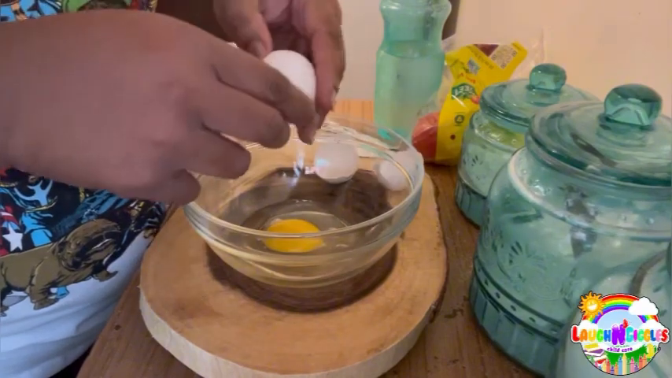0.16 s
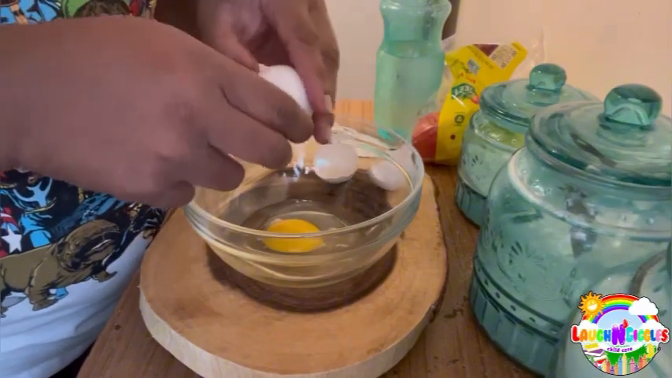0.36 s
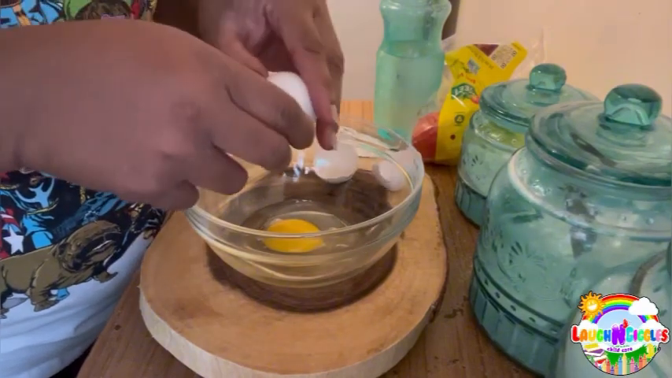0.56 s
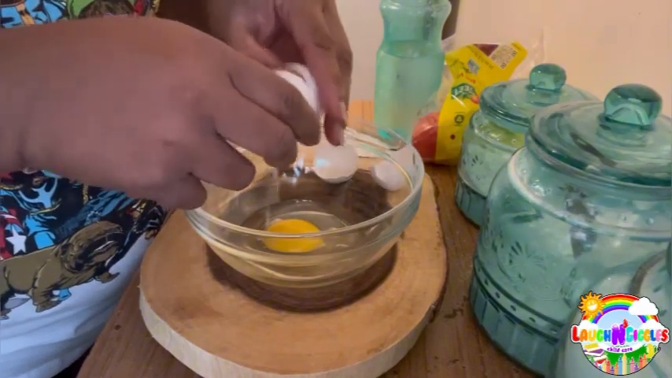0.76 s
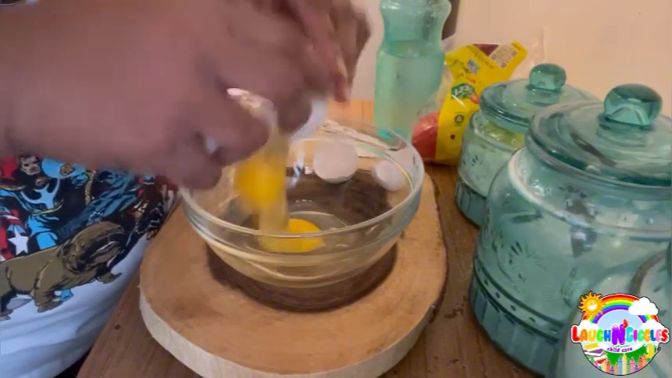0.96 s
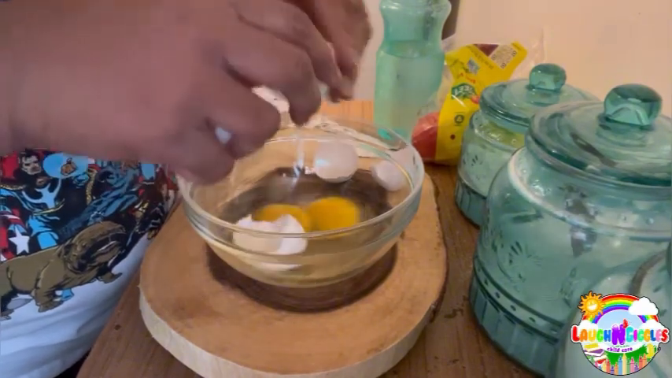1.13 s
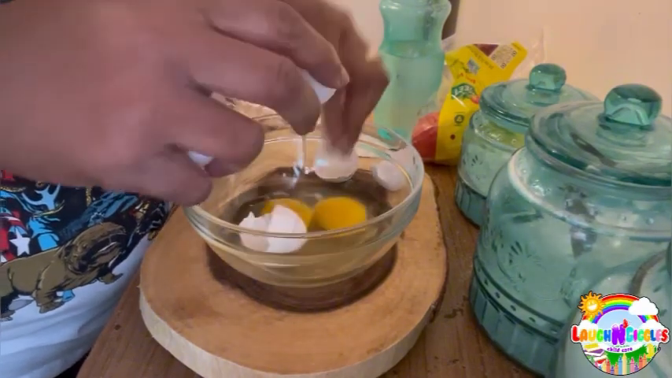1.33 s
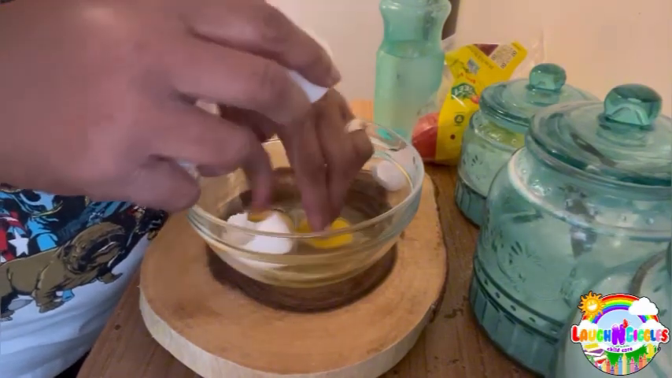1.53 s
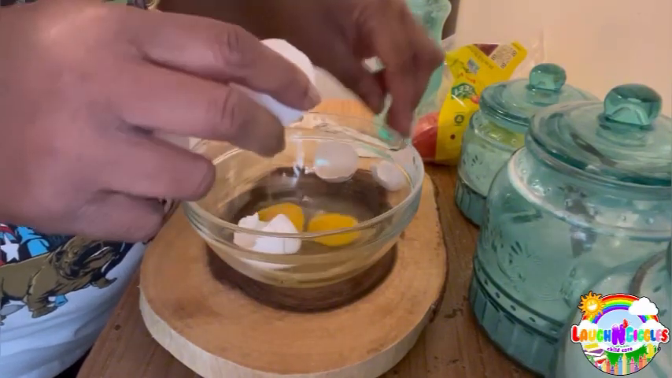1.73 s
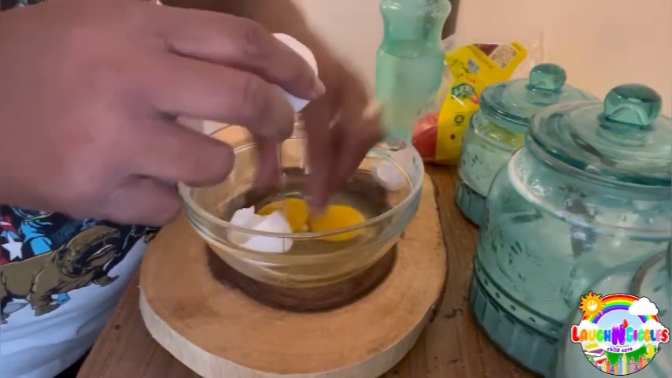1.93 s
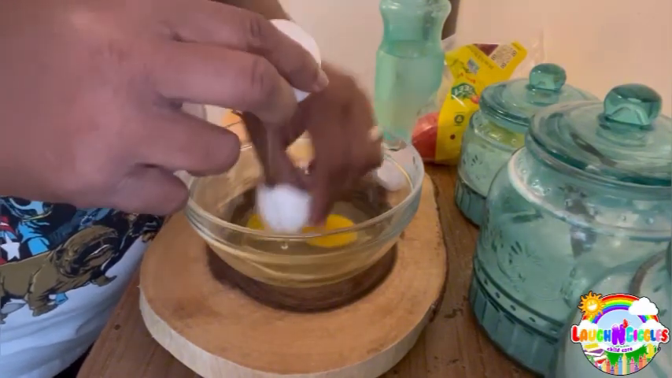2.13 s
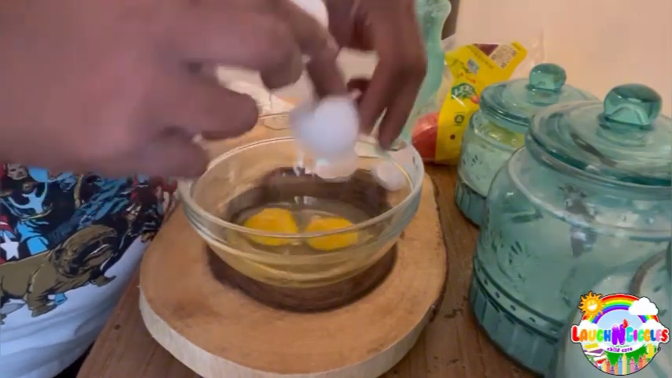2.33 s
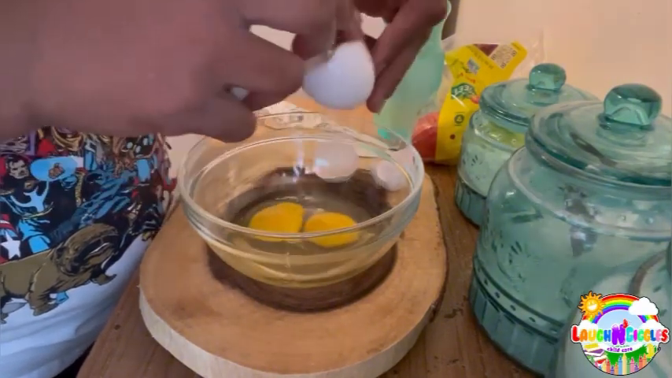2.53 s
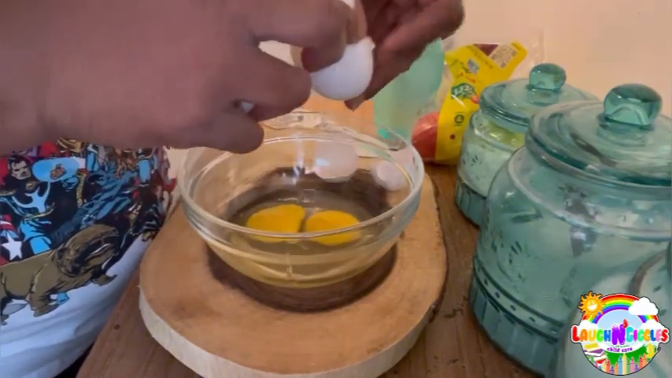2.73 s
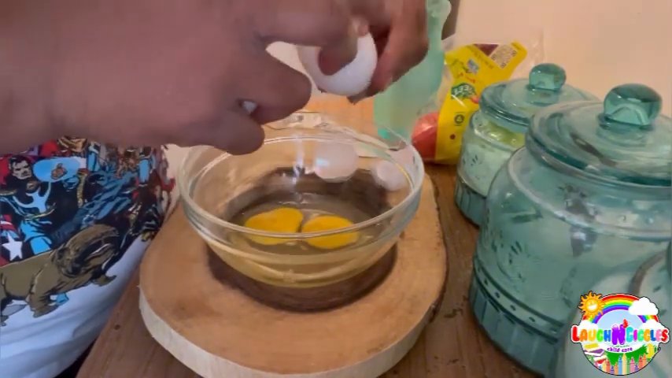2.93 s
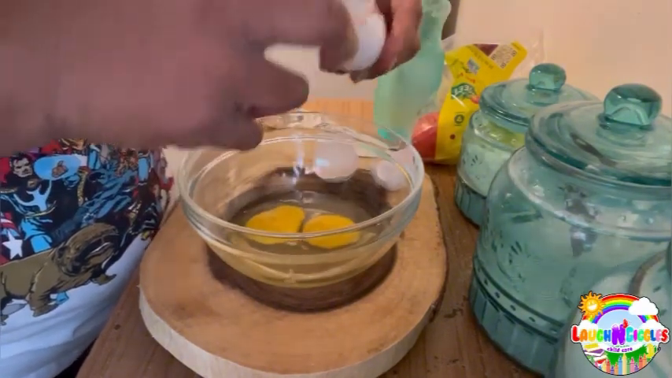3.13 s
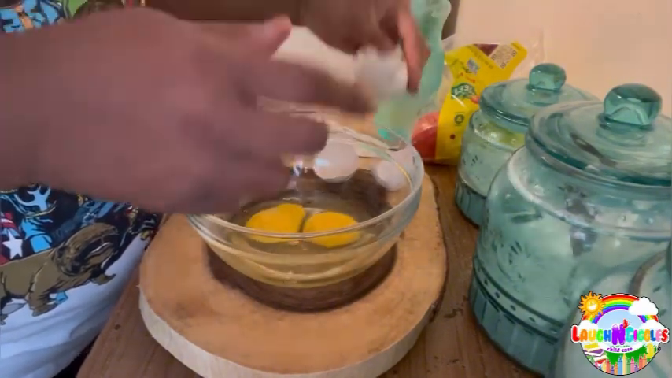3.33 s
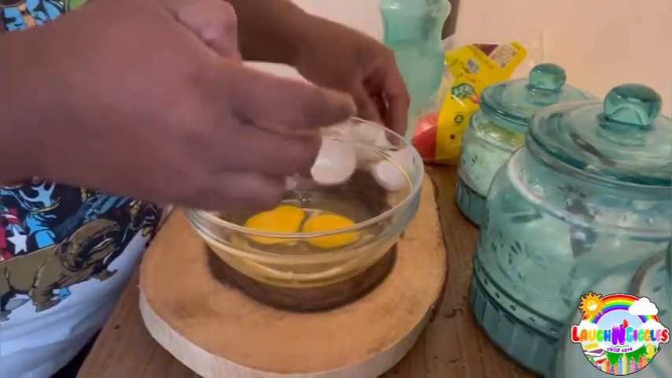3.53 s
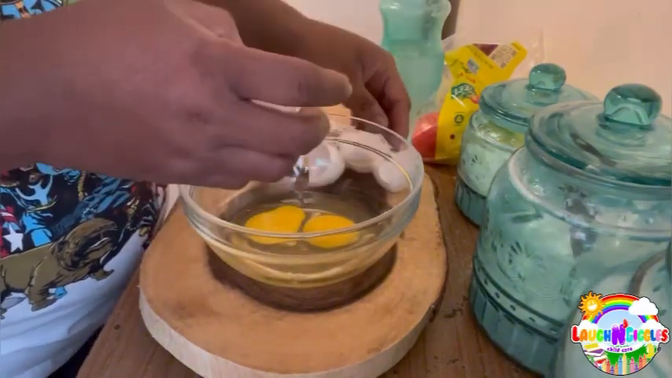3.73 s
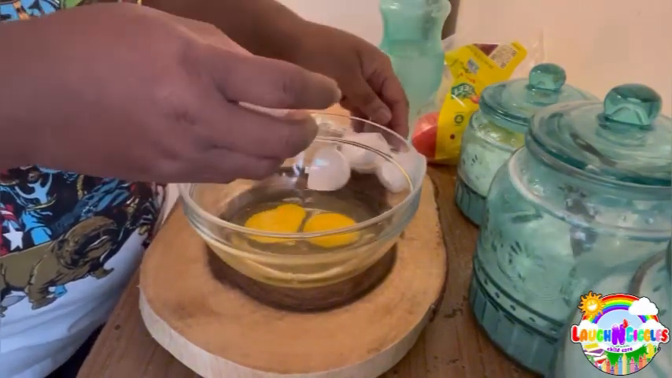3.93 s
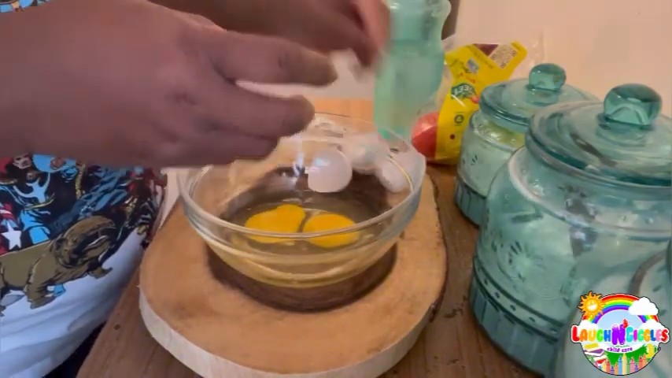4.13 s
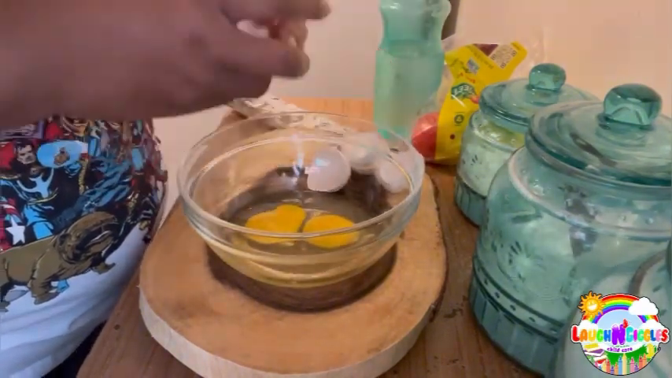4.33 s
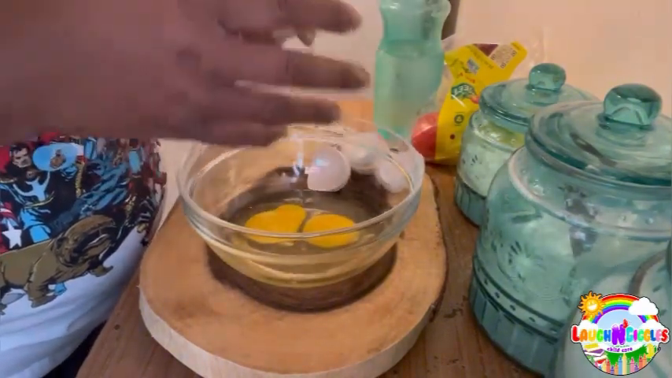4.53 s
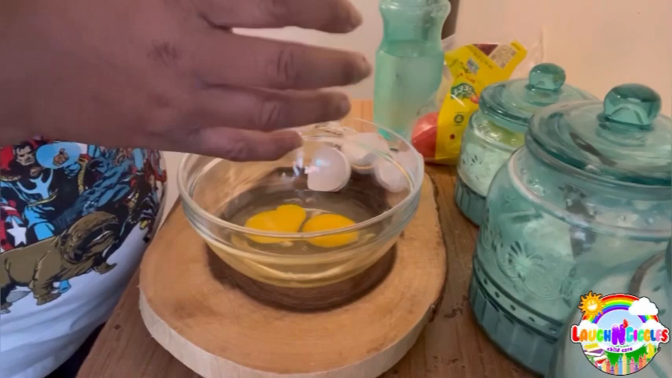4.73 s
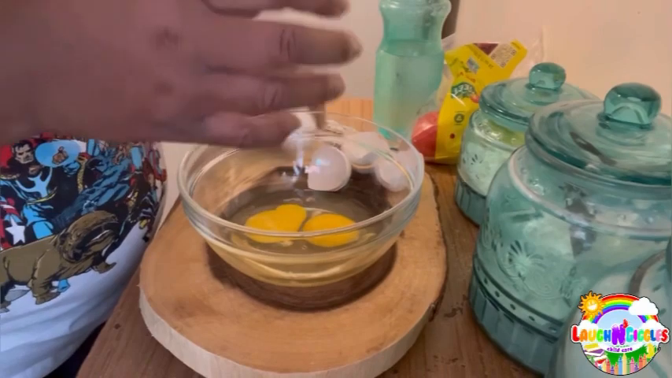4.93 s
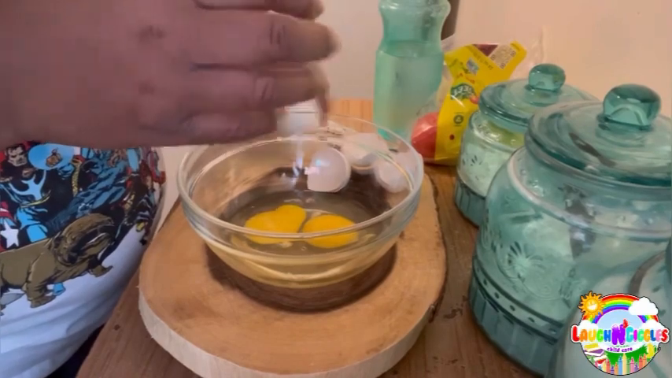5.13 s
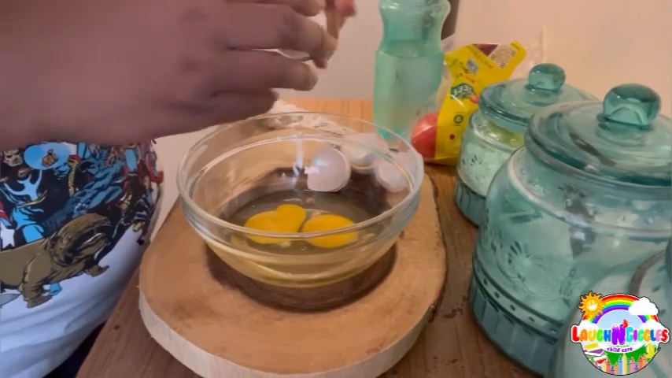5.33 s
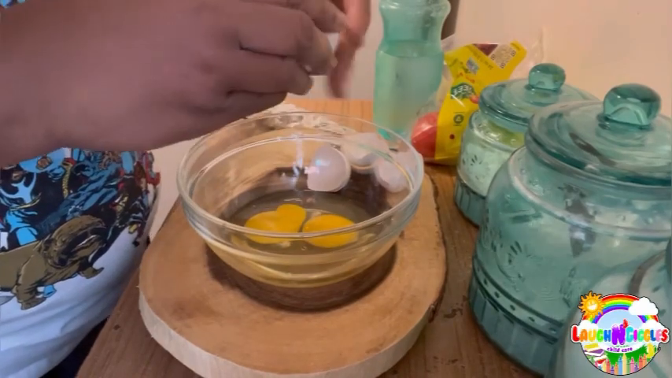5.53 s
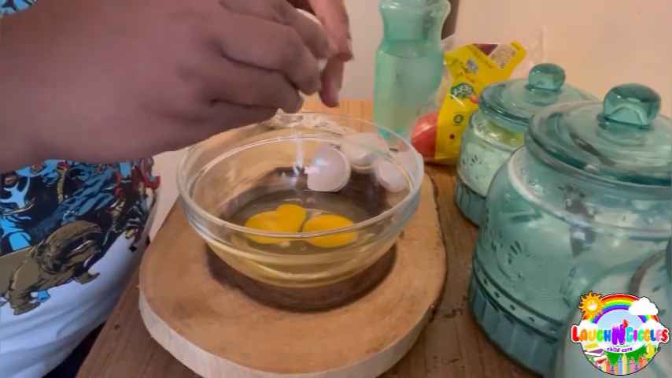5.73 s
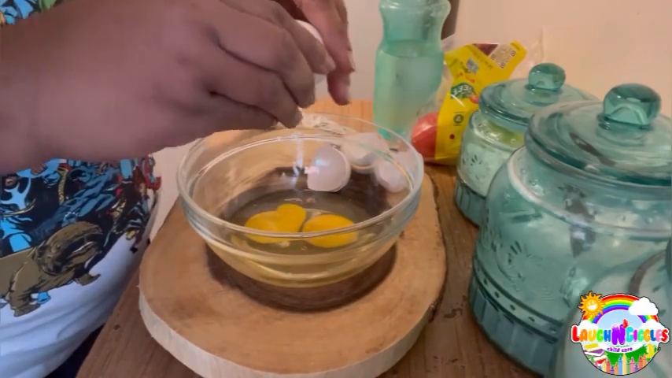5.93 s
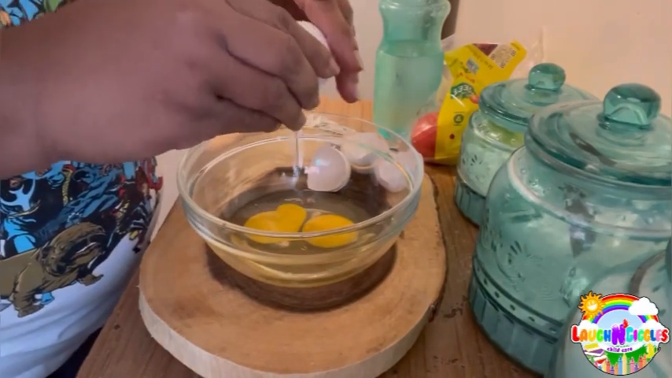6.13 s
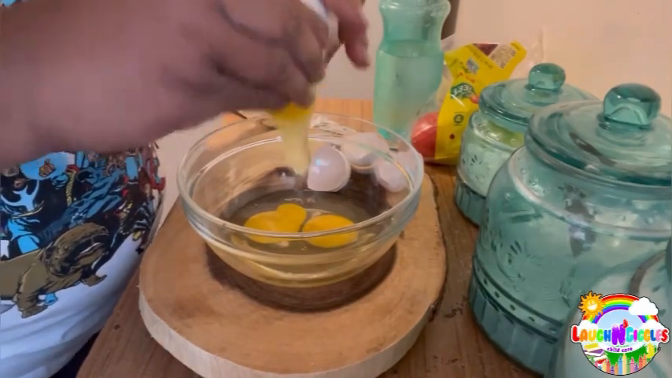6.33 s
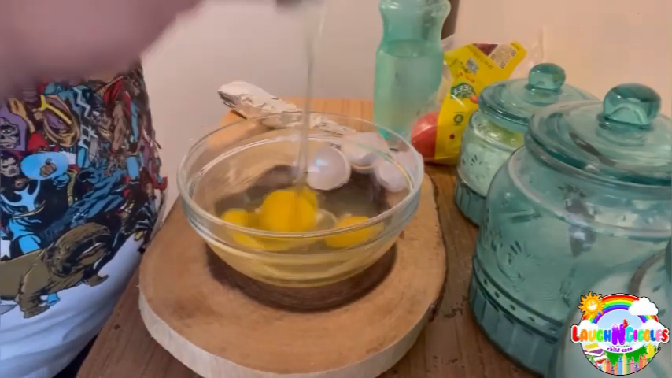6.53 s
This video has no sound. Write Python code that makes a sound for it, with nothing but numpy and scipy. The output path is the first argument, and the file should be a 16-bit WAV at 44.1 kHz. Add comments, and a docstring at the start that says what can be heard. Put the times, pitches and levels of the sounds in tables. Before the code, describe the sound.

Close, crisp shell crunches and a small wet squelch, a quiet pause, three ringing glass-bowl knocks with low thuds, then sharp snaps and a plop.

```python
"""Opening eggs over a glass bowl

A small kitchen, with a pair of microphones close to a glass bowl on a wooden slab; a low rumble fills the room.
Thumbs pry a shell apart with snaps and crunches, and the empty halves are put down; all are runs of tiny breaks,
filtered by the shell's wall and hollows. The next egg is knocked three times on the rim: the bowl rings in dying
sines and rocks on the slab with low thuds. It is pried open with a squelch, and wet bubbles slop into the bowl."""
import sys
import numpy as np
from scipy import signal
from scipy.fft import rfft, irfft, next_fast_len
from scipy.io import wavfile

SR = 44100
rng = np.random.default_rng(int(sys.argv[2]) if len(sys.argv) > 2 else 0)


def wrap_up_sound(samples):
    """Save the sound to the file named by the first command line argument, as 16-bit audio."""
    columns = np.atleast_2d(samples).T
    # keep every value between -1 and 1, then stretch to whole-number steps
    tamed = np.clip(columns, -1, 1)
    steps = np.round(tamed * 32767).astype(np.int16)
    wavfile.write(sys.argv[1], SR, steps)


N = 289737

# Colour of the room's low rumble. Each row: frequency in Hz, relative level in dB per Hz.
RUMBLE_COLOUR = [(25, -36.5), (42, -11.5), (54, 0.5), (72, -9), (96, 1), (108, -8.5), (135, -1),
                 (167, -7.5), (196, -2), (245, -10.5), (265, -15.5), (300, -6), (410, -29.5), (900, -94.5)]
# Slow drift of the rumble. Each row: time in seconds, level in dB.
RUMBLE_LEVEL = [(0, -43), (2, -41.5), (5.8, -41), (6.1, -40), (6.57, -40.5)]
# Colour of the room's hiss. Each row: frequency in Hz, relative level in dB per Hz.
HISS_COLOUR = [(300, -5.5), (410, -12.5), (460, 2.5), (650, -7.5), (900, -5), (1100, -12), (1600, -15),
               (2300, -27.5), (3200, -30), (4400, -19.5), (5000, -27), (7200, -39.5), (10400, -33),
               (16000, -56.5)]
HISS_DB = -56
# Kitchen reverberation. Each row: frequency in Hz, time to die by 60 dB in seconds, level in dB.
ROOM = [(100, 0.3, -11.5), (303, 0.26, -3), (794, 0.35, -6.5), (2000, 0.34, -3.5), (4760, 0.37, -9.5),
        (9000, .4, -15), (14480, 0.26, -1.5)]

# Shell bumping against the bowl or the slab, or a finger touching the bowl (the row at 2.085 s). Each row:
# start in seconds, level in dB.
BUMPS = [(.561, -39), (2.085, -44.5), (2.899, -35), (3.551, -25.5), (6.173, -43.5)]
# Colour of a bump. Each row: frequency in Hz, level in dB per Hz.
BUMP_COLOUR = [(150, -9.5), (370, 7), (550, -12), (900, -1), (1200, -5), (1800, 2.5), (2300, -6),
               (3500, -8), (6000, -32)]
# The egg slops into the bowl. Each row: start in seconds, length in seconds, pitch in Hz, level in dB.
SLOPS = [(1.037, 0.031, 3300, -51.5), (6.512, 0.019, 1570, -46.5), (6.528, 0.016, 1590, -39.5)]
# Fingers grip and work a shell.
# Each row: start in seconds, length in seconds, hollow of the shell in Hz, crackle level in dB.
GRIPS = [(0.04, 0.4, 1940, -68), (.72, 0.26, 2080, -62.5), (1.27, 0.17, 2000, -71), (1.62, 0.17, 1500, -75),
         (1.982, 0.19, 2200, -58.5), (2.17, .26, 1920, -65.5), (2.52, 0.051, 1880, -65),
         (2.599, 0.14, 1950, -63), (2.793, 0.05, 2050, -62), (2.898, 0.051, 2170, -51),
         (3.509, 0.078, 2170, -48.5), (3.78, 0.15, 2700, -66.5), (3.92, .2, 2490, -74),
         (5.19, 0.11, 1470, -65.5), (5.68, 0.37, 1573, -59), (6.4, 0.31, 3250, -59.5)]
GRIP_ATTACK_S, GRIP_RELEASE_S = 0.017, 0.042
# Now and then a flake gives way and the crackle leaps: rate, decay time, size against the even strain.
TICKS_PER_S, TICK_S, TICK_DB = 18, .003, 13
# Air pockets against the dry crackle: the higher ones radiate better.
POCKET_HZ, POCKET_DB, POCKET_DB_PER_OCTAVE = 2000, -4, 6.5
# Crackle before a snap: level against the snap, and how far it swells over the strain.
STRAIN_DB, STRAIN_RISE_DB = -22.5, 16.5
# The two halves are pulled apart. Each row: moment of parting in seconds, level in dB,
# time the pitch takes to fall in seconds, swell by 20 dB in seconds, fade by 20 dB in seconds.
PARTINGS = [(.87, -38.5, .15, 0.039, 0.057), (6.185, -43, .1, 0.075, 0.12)]
SHUT_HZ, OPEN_HZ = 2805, 1514   # the wet gap between the halves, just cracked and wide open
# Snaps of shell. Each row: start in seconds, crack level in dB, hollow of the shell in Hz,
# hollow level in dB, length in seconds of the crackling strain before it.
SNAPS = [(.253, -52, 2130, -48, 0), (0.366, -35.5, 1950, -42.5, 0.066), (0.499, -46, 2050, -37, 0.013),
         (0.5385, -37.5, 1890, -66, 0), (.5586, -40, 1830, -58, 0.0057), (0.7373, -31.5, 2570, -42, .04),
         (0.7653, -39.5, 2300, -45.5, 0.024), (0.882, -30.5, 1390, -48, 0.043), (0.9494, -56, 3630, -43, 0),
         (.982, -45.5, 2500, -57, 0.019), (1.0356, -37, 3360, -40, 0.0079),
         (2.0703, -45, 2300, -41.5, 0.0013), (2.284, -43.5, 1130, -66, 0), (2.298, -47, 1980, -59, 0),
         (2.6989, -46.5, 2130, -51.5, 0.15), (2.8603, -38, 2110, -42.5, 0), (2.8995, -30, 2210, -35.5, 0),
         (3.488, -40.5, 3000, -45.5, 0.0034), (3.5126, -49, 3040, -41, 0.0037),
         (3.7952, -49, 2410, -50, 0.0021), (3.8257, -64, 2500, -47, 0), (3.979, -72, 2070, -50, 0.0094),
         (5.469, -44.5, 1003, -71, 0.0041), (5.6463, -39, 2070, -55, 0.025),
         (5.7682, -40.5, 1315, -54.5, 0.0057), (5.977, -28, 1500, -48, 0), (6.096, -38.5, 2740, -44, 0),
         (6.1722, -19.5, 1333, -23.5, .012), (6.3767, -32, 1800, -40, 0.0074),
         (6.4005, -25.5, 2000, -43.5, 0), (6.4715, -39, 3480, -58, 0)]
# Colour of a fracture. Each row: frequency in Hz, level in dB per Hz.
FRACTURE_COLOUR = [(200, -35), (900, -2.5), (2000, 0.5), (3500, -1), (5500, 12), (7200, 9), (10500, 5),
                   (13000, -5), (16000, -26)]
BREAK_SPREAD_DB = 3.5

# Thud of bowl and slab. Each row: mode in Hz, level in dB, time to die by 60 dB in seconds.
SLAB_MODES = [(88, -18, 0.27), (110, -3.5, 0.1), (157.3, -15, 0.34), (223.7, -3.5, 0.093), (248, -1, 0.087),
              (294, -13, 0.11), (500, -18.5, 0.05)]
# Glass bowl, damped by the eggs in it.
# Each row: mode in Hz, level in dB, time to die by 60 dB in seconds, lead of the left side in radians.
BOWL_MODES = [(579, -9, 0.092, 0.11), (688.5, -25.5, 0.93, -0.21), (690, -7.5, 0.18, -1.8),
              (755, 2, 0.024, 1), (836, 0, 0.083, -1.4), (989, -7, 0.11, 0.75), (1089, -10.5, 0.088, 1),
              (1297, -14.5, 0.11, -0.42), (1384, -13, 0.075, -.2), (1507, -14, 0.058, -0.029),
              (1690, -19.5, 0.083, 0.14), (2570, -19, 0.067, -.6), (2510, -26, 0.04, -1.4),
              (3420, -7, 0.022, -0.4), (4600, -21, 0.033, 0.41), (4630, -28, 0.072, 0)]
# Egg on the rim. Each row: start in seconds, crack level in dB, hollow of the egg in Hz, hollow level in dB,
# shell ping in Hz, ping level in dB, glass level in dB, thud level in dB, thud delay in seconds,
# rebound level in dB, rebound delay in seconds, rattle level in dB.
KNOCKS = [(4.6295, -18.5, 1440, -15.5, 1975, -11.5, -13.5, -9.5, 0.0074, -6.5, .0180, -48),
          (4.8368, -21, 1000, -16.5, 2570, -15, -15.5, -7, 0.007, -9, .0178, -18.5),
          (5.0155, -24.5, 1430, -29, 3380, -37, -23, -24, 0.009, -11.5, .0175, -45)]
# Colour of a blow on the rim. Each row: frequency in Hz, level in dB per Hz.
RIM_COLOUR = [(200, -6.5), (900, -1.5), (2400, 2), (3300, 3.5), (4300, 3.5), (5300, 3), (7500, -1),
              (10500, -3.5), (13000, -13.5), (16000, -35.5)]

PORT_LAG_S = .000076   # close sounds reach the right microphone first
CUTOFF_HZ = 16200


def from_db(db):
    """Decibels to amplitude."""
    return 10 ** (np.asarray(db) / 20)


def rms_one(x):
    """Scales a sound to an rms of one."""
    return x / np.sqrt(np.mean(x ** 2) + 1e-20)


def seconds(length):
    """A time axis from zero."""
    return np.arange(int(length * SR)) / SR


def at_hz(points, hz, axis=1):
    """Reads a table on a log-frequency axis."""
    points = np.array(points)
    return np.interp(np.log(np.maximum(hz, 1)), np.log(points[:, 0]), points[:, axis])


def add(out, s, sound):
    """Mixes a sound in at time s."""
    start = max(int(s * SR), 0)
    out[:, start:start + sound.shape[-1]] += sound[..., :N - start]


def at_level(x, db, length):
    """Gives a sound the energy of that rms level held for that long."""
    return from_db(db) * x * np.sqrt(length * SR / (np.sum(x ** 2) + 1e-30))


def coloured(x, spectrum, size=1024):
    """Causal (minimum-phase) filter with the given spectrum."""
    hz = np.arange(size // 2 + 1) * SR / size
    cepstrum = irfft(np.log(from_db(at_hz(spectrum, hz))))
    # folding the cepstrum onto positive times makes the filter minimum-phase
    cepstrum[1:size // 2] *= 2
    cepstrum[size // 2 + 1:] = 0
    return signal.fftconvolve(x, irfft(np.exp(rfft(cepstrum))))[:len(x)]


def hollow(x, hz, damping):
    """An air resonance, applied twice, with the given damping ratio."""
    r = np.exp(-2 * np.pi * hz * damping / SR)
    section = [1 - r, 0, r - 1, 1, -2 * r * np.cos(2 * np.pi * hz / SR), r * r]
    return signal.sosfilt([section, section], x)


def mode(t, hz, db, t60, phase=0):
    """A struck mode: a dying sine."""
    return from_db(db - 60 * t / t60) * np.sin(2 * np.pi * hz * t + phase)


def two_ports(x):
    """The left microphone hears a close sound slightly later."""
    size = next_fast_len(len(x) + 64)
    hz = np.arange(size // 2 + 1) * SR / size
    late = irfft(rfft(x, size) * np.exp(-2j * np.pi * hz * PORT_LAG_S), size)
    return np.array([late[:len(x)], x])


def steady_noise(spectrum, side_db):
    """Stereo noise of a given colour and width."""
    mid, side = (coloured(white, spectrum, size=8192) for white in rng.standard_normal((2, N)))
    return rms_one(mid + from_db(side_db) * side * np.array([[1], [-1]]))


def background():
    """Low rumble in the room's resonances, nearly alike on both sides, and a faint wider hiss."""
    rumble_db = np.interp(np.arange(N) / SR, *np.transpose(RUMBLE_LEVEL))
    rumble = from_db(rumble_db) * steady_noise(RUMBLE_COLOUR, side_db=-12.5)
    hiss = from_db(HISS_DB) * steady_noise(HISS_COLOUR, side_db=0)
    return (rumble + hiss) * from_db([[.5], [-.5]])


def kitchen(x, first_s=0.0018, build_s=0.00057):
    """Diffuse reflections, different at each microphone, that die away band by band."""
    t, response = seconds(.6), 0
    edges = np.geomspace(50, 17000, 13)
    onset = 1 - np.exp(-np.maximum(t - first_s, 0) / build_s)
    for low, high in zip(edges, edges[1:]):
        hz = np.sqrt(low * high)
        t60, db = at_hz(ROOM, hz, axis=1), at_hz(ROOM, hz, axis=2)
        bandpass = signal.butter(2, [low, high], "band", fs=SR, output="sos")
        band = signal.sosfilt(bandpass, rng.standard_normal((2, len(t))))
        tail = band * from_db(-60 * t / t60) * onset
        energy = np.sum(tail ** 2, axis=1, keepdims=True)
        response = response + from_db(db) * tail * np.sqrt(2 * (high - low) / SR / energy)
    return signal.fftconvolve(x, response, axes=1)[:, :N]


def fractures(envelope, per_s):
    """Tiny breaks of uneven size come at random under an envelope, the first at its start."""
    count = len(envelope)
    born = rng.random(count) < per_s / SR
    born[0] = True
    sign = rng.choice([-1, 1], count)
    size = from_db(BREAK_SPREAD_DB * np.clip(rng.normal(size=count), -2, 2))
    return envelope * born * sign * size + 1e-18


def bumps(touch_s=0.0082):
    """A light shell, or a finger, meets a hard surface with a dull, short rattle."""
    out, t = np.zeros((2, N)), seconds(.08)
    for s, db in BUMPS:
        touches = fractures(np.exp(-t / touch_s), per_s=3300)
        add(out, s, two_ports(at_level(coloured(touches, BUMP_COLOUR), db, 0.0029)))
    return out


def wet_grains(breaks, hz, octaves=0.29, damping=0.048, count=6):
    """Each break sounds a small pocket of air in the wet shell, at its own pitch near that of the hollow."""
    pocket = rng.integers(0, count, len(breaks))
    offsets = np.linspace(-octaves, octaves, count)
    return sum(hollow(breaks * (pocket == k), hz * 2 ** offset, damping) for k, offset in enumerate(offsets))


def slops(spatter_db=-14, smack_db=-6, smack_hz=2700, smack_damping=0.97):
    """Yolk and white land in the bowl with a smack, a short cluster of small bubbles and a little spatter."""
    out, t = np.zeros((2, N)), seconds(.12)
    for s, length, hz, db in SLOPS:
        breaks = fractures(np.sin(np.pi * np.minimum(t / length, 1)), per_s=2500)
        smack = at_level(hollow(breaks, smack_hz, smack_damping), db + smack_db, length)
        spatter = at_level(coloured(breaks, FRACTURE_COLOUR), db + spatter_db, length)
        bubbles = at_level(wet_grains(breaks, hz, octaves=0.33, damping=0.17), db, length)
        add(out, s, two_ports(bubbles + smack + spatter))
    return out


def tremor(count):
    """An even strain with sudden ticks at random moments."""
    ticks = (rng.random(count) < TICKS_PER_S / SR) * from_db(TICK_DB)
    return 1 + signal.lfilter([1], [1, -np.exp(-1 / (TICK_S * SR))], ticks + 1e-18)


def crackle(envelope, hz, db, length, wall_db=-5, wall_hz=4400, wall_damping=0.39):
    """A run of tiny breaks, heard dry, through the shell's wall and through the air pockets of the wet shell."""
    breaks = fractures(np.pad(envelope, (0, SR // 50)), per_s=800)   # padded to let it ring out
    pocket_db = db + POCKET_DB + POCKET_DB_PER_OCTAVE * np.log2(hz / POCKET_HZ)
    direct = at_level(coloured(breaks, FRACTURE_COLOUR), db, length)
    wall = at_level(hollow(breaks, wall_hz, wall_damping), db + wall_db, length)
    pockets = at_level(wet_grains(breaks, hz), pocket_db, length)
    return two_ports(direct + wall + pockets)


def grips():
    """The fingers press, hold and let go; shell and membrane give way in tiny breaks."""
    out, t = np.zeros((2, N)), seconds(.6)
    for s, length, hz, db in GRIPS:
        pressure = np.clip(np.minimum(t / GRIP_ATTACK_S, (length - t) / GRIP_RELEASE_S), 0, 1)
        add(out, s, crackle(pressure * tremor(len(t)), hz, db, length))
    return out


def strains():
    """A shell that resists crackles louder and louder until it snaps."""
    out = np.zeros((2, N))
    to_go = seconds(.2)[::-1]   # time left before the snap
    for s, crack_db, hz, _, strain_s in SNAPS:
        if strain_s > 0:
            swell = from_db(-STRAIN_RISE_DB * to_go / strain_s)
            add(out, s - to_go[0], crackle(swell, hz, crack_db + STRAIN_DB, strain_s))
    return out


def snaps(run_s=0.0044, damping=0.11, ring_s=0.0038, wall_db=-5, wall_hz=2600, wall_damping=1.0):
    """A crack runs through the shell in a few milliseconds; it sounds the hollow and, more broadly, the wall."""
    out, t = np.zeros((2, N)), seconds(.06)
    for s, crack_db, hz, hollow_db, _ in SNAPS:
        breaks = fractures(np.exp(-t / run_s), per_s=6000)
        crack = at_level(coloured(breaks, FRACTURE_COLOUR), crack_db, 0.0023)
        wall = at_level(hollow(breaks, wall_hz, wall_damping), hollow_db + wall_db, 0.001)
        air_breaks = fractures(np.exp(-t / ring_s), per_s=9700)
        air = at_level(hollow(air_breaks, hz, damping), hollow_db, 0.0024)
        add(out, s, two_ports(crack + wall + air))
    return out


def partings(scatter_octaves=.18, damping=0.051, count=16):
    """A wet squelch: the gap between the halves widens and its pitch falls; it is loudest as they part."""
    out = np.zeros((2, N))
    pitches = np.geomspace(OPEN_HZ / np.sqrt(2), SHUT_HZ * np.sqrt(2), count)
    t = seconds(.5) - .2   # zero at the parting
    for s, db, fall_s, swell_s, fade_s in PARTINGS:
        breaks = fractures(from_db(-20 * np.maximum(-t / swell_s, t / fade_s)), per_s=700)
        gap_hz = OPEN_HZ * (SHUT_HZ / OPEN_HZ) ** np.clip(-t / fall_s, 0, 1)
        grain_hz = gap_hz * 2 ** (scatter_octaves * rng.normal(size=len(t)))
        pocket = np.round(np.interp(grain_hz, pitches, np.arange(count)))
        squelch = sum(hollow(breaks * (pocket == k), hz, damping) for k, hz in enumerate(pitches))
        held_s = (swell_s + fade_s) / (2 * np.log(10))   # a steady sound this long has the envelope's energy
        add(out, s + t[0], two_ports(at_level(squelch, db, held_s)))
    return out


def thud(t, contact_s=0.0019, lowest_hz=55):
    """The slab's low modes under a soft push; the deepest bass hardly radiates."""
    push = signal.windows.hann(max(int(contact_s * SR), 3))
    ringing = sum(mode(t, *row) for row in SLAB_MODES)
    low = signal.fftconvolve(ringing, push / push.sum())[:len(t)]
    return signal.sosfilt(signal.butter(1, lowest_hz, "high", fs=SR, output="sos"), low)


def glass(t, egg_hz, favour_db=5, octaves=0.24, strike_s=0.00063):
    """The bowl rings, its modes favoured near the pitch of the egg that strikes it."""
    out = 0
    for k, (hz, db, t60, lead) in enumerate(BOWL_MODES):
        favoured_db = favour_db * np.exp(-(np.log2(hz / egg_hz) / octaves) ** 2)
        uneven_db = rng.normal() * 2
        phase = np.array([[lead / 2], [-lead / 2]])
        out = out + (-1) ** k * mode(t, hz, db + favoured_db + uneven_db, t60, phase)
    return out * (1 - np.exp(-t / strike_s))


def bowl():
    """Under each knock the glass rings and the bowl tips, then drops back on the slab with a rattle."""
    out, t = np.zeros((2, N)), seconds(0.73)
    low = thud(t) * from_db([[-1.5], [1.0]])
    for s, _, egg_hz, *_, glass_db, thud_db, thud_s, rebound_db, rebound_s, rattle_db in KNOCKS:
        add(out, s, from_db(glass_db) * glass(t, egg_hz))
        add(out, s + thud_s, from_db(thud_db) * low)
        add(out, s + rebound_s, from_db(rebound_db) * low + from_db(rattle_db) * glass(t, egg_hz))
    return out


def rim_cracks(crush_s=0.0025, egg_damping=0.37, rise_s=0.00093, scatter_db=-4, scatter_s=0.000996,
               ping_t60=0.017):
    """The shell pings and caves in on the rim in dense breaks, which the curved glass scatters to each side."""
    out, t = np.zeros((2, N)), seconds(.06)
    rise = 1 - np.exp(-t / rise_s)
    crush = rise * np.exp(-t / crush_s)
    for s, crack_db, egg_hz, egg_db, ping_hz, ping_db, *_ in KNOCKS:
        bursts = [fractures(crush, per_s=20000) for way in ("direct", "left", "right")]
        direct, left, right = (at_level(coloured(burst, RIM_COLOUR), crack_db, 0.011) for burst in bursts)
        air = at_level(hollow(bursts[0], egg_hz, egg_damping), egg_db, 0.0018)
        ping = rise * mode(t, ping_hz, ping_db, ping_t60)
        add(out, s, two_ports(direct + air + ping))
        add(out, s + scatter_s, from_db(scatter_db) * np.array([left, right]))
    return out


def shells():
    """Everything that breaks, and the wet egg inside."""
    return rim_cracks() + snaps() + strains() + grips() + partings() + slops()


def scene():
    """Egg and bowl close by, the kitchen around them."""
    shell, body = shells(), bowl() + bumps()
    # a breaking shell sends a different crackle each way, so its reverberation is smoother than its direct sound
    reverberation = kitchen(body + shell / np.sqrt(2)) + kitchen(shells() / np.sqrt(2))
    return shell + body + reverberation + background()


def record(dry, low_cut_hz=40):
    """The deepest bass is cut, the highest peaks are rounded and the top is cut."""
    thinned = signal.sosfilt(signal.butter(3, low_cut_hz, "high", fs=SR, output="sos"), dry)
    rounded = 1.515 * np.tanh(thinned / 1.482)
    return signal.sosfilt(signal.ellip(10, .1, 90, CUTOFF_HZ, fs=SR, output="sos"), rounded)


dry = scene()
out = record(dry)
wrap_up_sound(out)
```